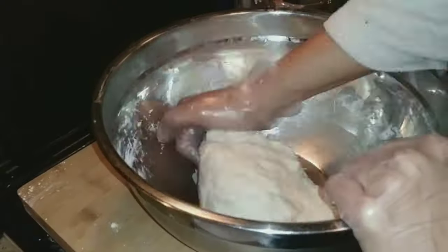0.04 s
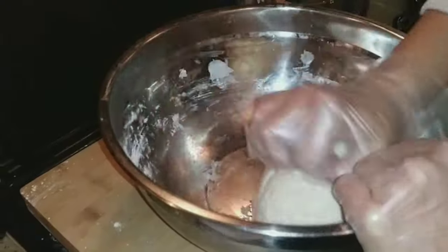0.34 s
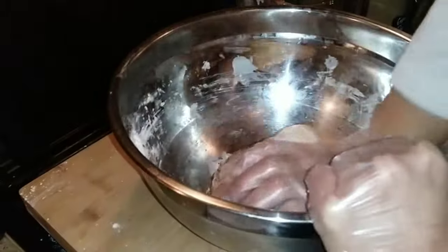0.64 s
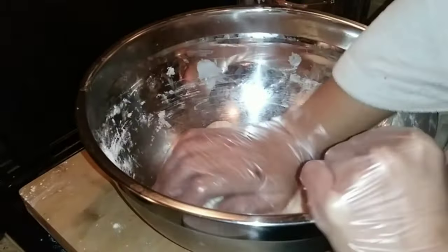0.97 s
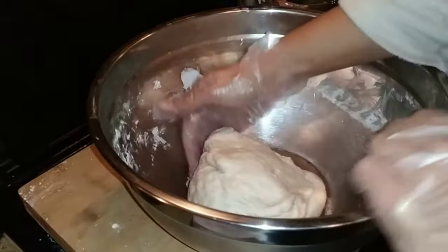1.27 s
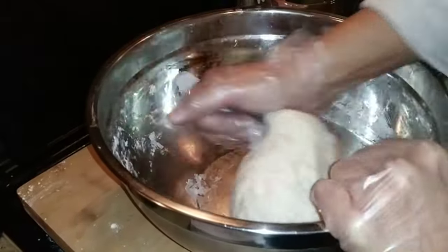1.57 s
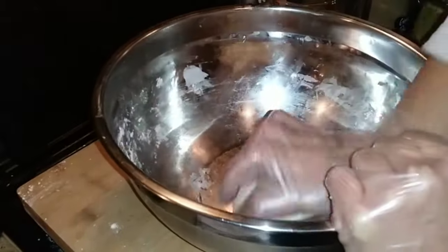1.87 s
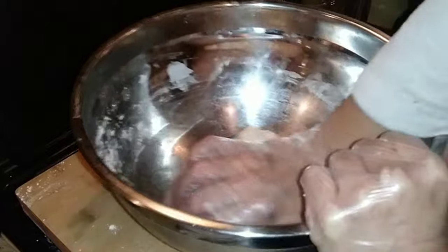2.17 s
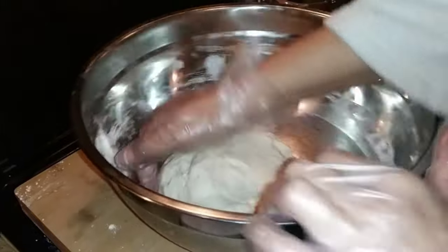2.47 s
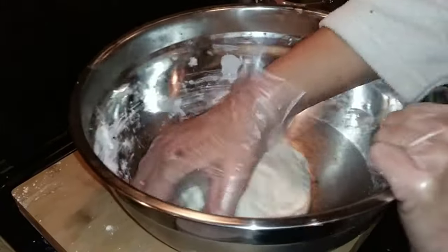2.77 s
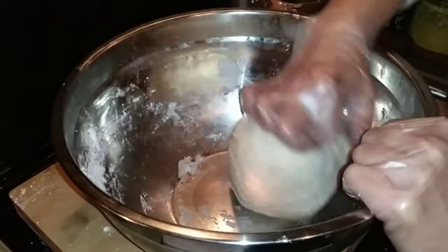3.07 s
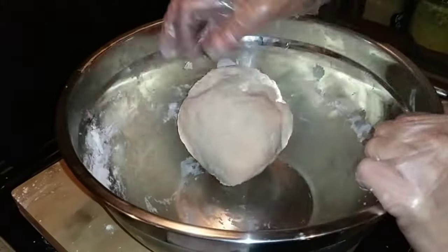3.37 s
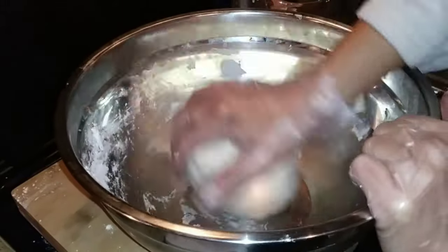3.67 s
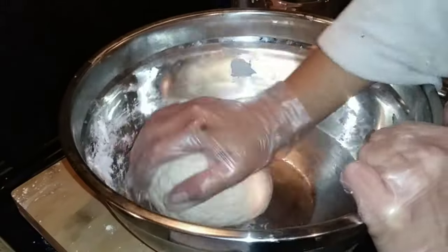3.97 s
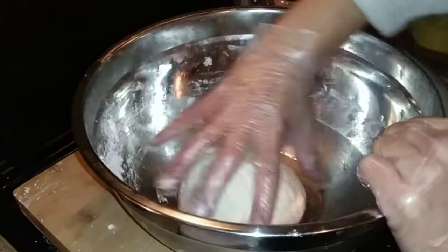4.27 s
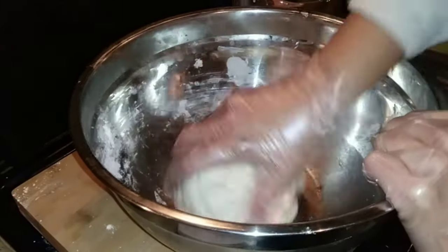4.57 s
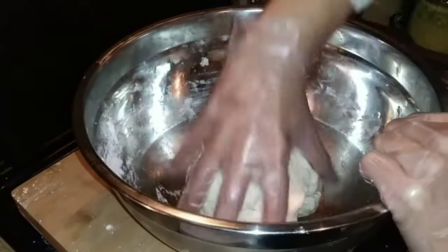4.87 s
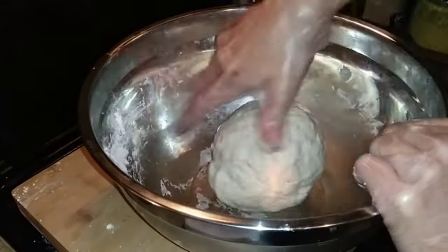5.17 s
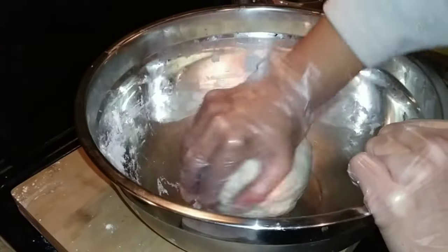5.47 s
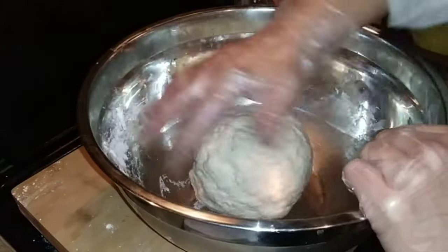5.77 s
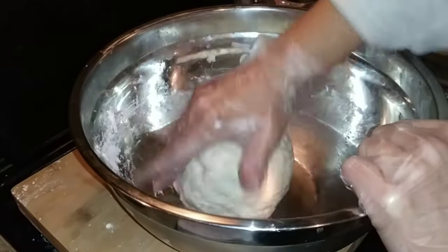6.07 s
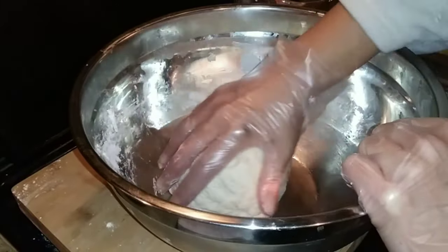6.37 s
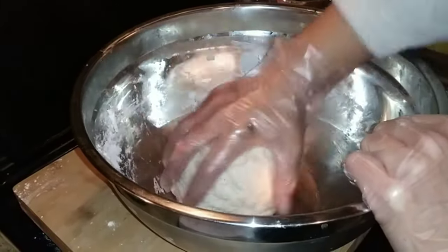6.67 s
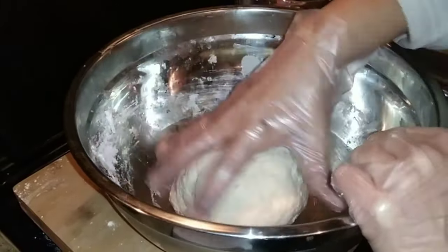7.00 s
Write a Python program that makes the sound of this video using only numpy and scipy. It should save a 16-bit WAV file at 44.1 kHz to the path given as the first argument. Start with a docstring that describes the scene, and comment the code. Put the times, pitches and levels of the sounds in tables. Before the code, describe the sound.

A hand in a thin plastic glove kneads dough in a steel bowl, close to a small microphone in a quiet kitchen. The glove crinkles in bright, uneven strokes with brief rubs, while the dough drags faintly on the steel. The bowl bumps dully on its wooden board, once hard about a third of the way in. Toward the end the strokes become shorter, separate grabs with sharp crackles and snaps.

```python
"""A thin plastic glove kneads dough in a steel bowl, close to a small microphone in a kitchen.
Its film buckles into crinkles with every stroke, rubs as it slides, snaps at single creases
and crackles as it grabs. The dough sticks and slips on the steel. The bowl, damped by the
other hand, knocks on its wooden board, once hard, and thuds under the dough."""
import sys
import numpy as np
from scipy import signal
from scipy.fft import rfft, irfft, next_fast_len
from scipy.io import wavfile
from scipy.ndimage import map_coordinates

SR = 44100
rng = np.random.default_rng(int(sys.argv[2]) if len(sys.argv) > 2 else 0)


def store_wav(level_fs):
    """Save 16-bit WAV to argv[1]."""
    pcm = np.round(np.clip(np.atleast_2d(level_fs), -1, 1) * 32767)
    wavfile.write(sys.argv[1], SR, pcm.T.astype(np.int16))


N = 319284


def amp(db):
    """Decibels to gain."""
    return 10 ** (np.asarray(db) / 20)


def unit_rms(x):
    """Scale to rms 1."""
    return x / np.sqrt(np.mean(x ** 2) + 1e-20)


def at_hz(points, hz):
    """Interpolate (f, value) points on a log frequency axis."""
    knots_hz, values = np.transpose(points)
    return np.interp(np.log(hz + 1), np.log(knots_hz + 1), values)


def per_sample(times_s, values):
    """Interpolate a time curve to N samples."""
    return np.interp(np.arange(N) / SR, times_s, values)


def wobble(rate_hz):
    """Smooth random curve through rate_hz knots a second."""
    knots = rng.standard_normal(int(N * rate_hz / SR) + 4)
    return map_coordinates(knots, [np.arange(N) * rate_hz / SR])


def add(track, start_s, sound):
    """Mix a sound into the track."""
    span = track[round(start_s * SR):][:len(sound)]
    span += sound[:len(span)]


def coloured(x, spectrum, size=4096):
    """Minimum-phase filter of energy 1 with the given spectrum."""
    gain = amp(at_hz(spectrum, np.fft.rfftfreq(size, 1 / SR)))
    cepstrum = irfft(np.log(gain))
    cepstrum[1:size // 2] *= 2
    cepstrum[size // 2 + 1:] = 0
    response = irfft(np.exp(rfft(cepstrum)))
    return signal.fftconvolve(x, response / np.linalg.norm(response))[:len(x)]


def resonate(x, hz, q):
    """Two passes through one resonance; rms 1."""
    resonance = signal.iirpeak(hz, q, fs=SR)
    return unit_rms(signal.lfilter(*resonance, signal.lfilter(*resonance, x)))


def clicks(rate_hz, scatter_db):
    """Random impulses with log-normal sizes; rms 1."""
    chance = np.clip(rate_hz / SR, 1e-4, 1)
    sizes = amp(scatter_db * np.clip(rng.standard_normal(N), -2, 2)) * rng.choice([-1, 1], N)
    return unit_rms((rng.random(N) < chance) * sizes / np.sqrt(chance))


# Rustle between strokes: t/s, drive/dB
REST_DRIVE = [(0, -56), (.85, -60.5), (1, -65), (1.5, -56.5), (3, -52), (3.45, -64.5), (4.5, -59),
              (5.1, -56.5), (5.4, -68), (6.4, -60), (7.24, -56.5)]
# Hand strokes: t/s at full speed, swell/s, hold/s, fade/s, crinkle drive/dB, crumple re crinkle/dB
HAND_STROKES = [(0.0, .05, 0.13, .05, -52.5, 0), (0.323, 0.16, 0.055, 0.26, -39.5, -5),
                (0.641, 0.33, 0.039, 0.062, -44, -2.5), (0.772, 0.22, 0.12, 0.19, -52, -3),
                (1.055, 0.042, 0.02, 0.26, -45.5, -8.5), (1.204, 0.11, 0.042, 0.026, -34, -5.5),
                (1.299, 0.12, 0.018, 0.23, -40.5, -10), (1.435, 0.21, 0.15, .06, -45, -5.5),
                (1.711, 0.1, 0.0066, 0.13, -39, -7.5), (1.914, 0.2, 0.03, 0.11, -35, -9.5),
                (2.079, 0.2, 0.19, 0.24, -51, -2), (2.519, 0.22, 0.034, 0.2, -37, -5.5),
                (2.715, 0.074, 0.047, 0.2, -35.5, -8.5), (2.852, 0.17, 0.094, 0.1, -46, -6),
                (3.053, 0.068, 0.05, 0.027, -31.5, -11), (3.204, 0.19, 0.024, 0.24, -41, -9),
                (3.368, 0.081, 0.04, 0.01, -34, -14), (3.59, 0.15, 0.027, 0.27, -36, -8),
                (3.987, 0.46, 0.037, 0.137, -44, -5), (4.147, 0.07, 0.029, 0.21, -34.5, -6),
                (4.302, 0.3, 0.059, 0.018, -43.5, -8.5), (4.474, 0.22, 0.075, .06, -50.5, -2.5),
                (4.656, 0.066, 0.024, 0.31, -37.5, -6.5), (4.918, 0.018, 0.011, 0.022, -39.5, -20),
                (4.985, 0.014, 0.026, 0.13, -42.5, -6.5), (5.194, 0.12, 0.04, 0.032, -33.5, -14.5),
                (5.286, .04, .01, 0.085, -47.5, -9), (5.722, 0.066, 0.06, 0.039, -30.5, -11.5),
                (6.162, 0.065, 0.046, 0.04, -33, -8.5), (6.553, 0.084, 0.044, 0.037, -33, -10),
                (6.958, 0.17, 0.091, 0.032, -38, -8)]


def kneading(range_db=25.5, rest_crumple_db=-7.5):
    """Hand motion as drive in dB for fine crinkle and deep crumple; a swell or fade spans range_db."""
    t = np.arange(0, N / SR, 0.001)
    moves = [(np.interp(t, *np.transpose(REST_DRIVE)), rest_crumple_db)]
    for full_s, swell_s, hold_s, fade_s, db, offset_db in HAND_STROKES:
        away = np.maximum(full_s - t, 0) / swell_s + np.maximum(t - full_s - hold_s, 0) / fade_s
        moves.append((db - range_db * away, offset_db))
    moves.extend(squeezes(t))
    crinkle_power = sum(amp(db) ** 2 for db, _ in moves)
    crumple_power = sum(amp(db + offset_db) ** 2 for db, offset_db in moves)
    return per_sample(t, 10 * np.log10(crinkle_power)), per_sample(t, 10 * np.log10(crumple_power))


# Fine glove crinkle, with the microphone's bright sheen near 8.5 kHz: f/Hz, level/dB
CRINKLE_SPECTRUM = [(1500, -48.5), (3500, -15), (5000, -13), (6700, -13.5), (7500, -5.5), (8200, 1),
                    (8900, 2.5), (9500, -2.5), (10500, -7), (12500, -14), (15500, -18.5)]
# Deep glove crumple: f/Hz, level/dB
CRUMPLE_SPECTRUM = [(30, -3.5), (100, -16), (300, -4), (500, 0), (630, -12), (850, -2.5), (1400, -1),
                    (2100, 1), (3500, -3.5), (5000, 0.5), (8000, -17), (15000, -43.5)]
# Hollow between hand and bowl: f/Hz, width per pass/Hz, relative level/dB
HOLLOW_MODES = [(844, 200, -10), (2080, 710, -14.5), (2960, 2900, -6)]


def glove_rustle(crinkle_db, crumple_db, hollow_pivot_db=-39.5, hollow_slope=1.67):
    """The film buckles in clumps: faster strokes click more and louder, larger folds sound deeper."""
    rate_hz = 3000 * amp(1.1 * (crinkle_db + 41))
    clumps_db = 1.78 * wobble(30) + 2.4 * wobble(300)
    buckles = clicks(rate_hz, scatter_db=5)
    fine_source = buckles + 1.04 * rng.standard_normal(N)
    deep_source = 0.77 * buckles + clicks(rate_hz, scatter_db=1.5) + 0.38 * rng.standard_normal(N)
    crinkle = amp(crinkle_db - 2) * unit_rms(coloured(fine_source, CRINKLE_SPECTRUM))
    crumple = amp(crumple_db - 5) * unit_rms(coloured(deep_source, CRUMPLE_SPECTRUM))
    hollow = sum(amp(db) * resonate(clicks(rate_hz, scatter_db=2.5), hz, q=hz / width_hz)
                 for hz, width_hz, db in HOLLOW_MODES)
    hollow_db = hollow_pivot_db + hollow_slope * (crumple_db - hollow_pivot_db)
    return amp(clumps_db) * (crinkle + crumple + amp(hollow_db) * hollow)


def glove_ticks(crinkle_db):
    """Taut folds tick throughout and stand out when the rustle is soft."""
    return amp(0.35 * crinkle_db - 48) * coloured(clicks(rate_hz=41, scatter_db=11.5), CRINKLE_SPECTRUM)


# Film slides: centre t/s, length/s, f/Hz, level/dB
SLIDES = [(0.082, 0.13, 680, -54.5), (.06, 0.077, 2900, -58.5), (0.056, .12, 5300, -61.5),
          (0.378, 0.077, 940, -50), (1.322, .08, 5800, -48), (2.131, 0.091, 1990, -57),
          (2.726, 0.12, 6030, -43.5), (2.928, 0.17, 5860, -52), (3.087, 0.06, 4100, -40),
          (3.602, 0.086, 5850, -42.5), (3.948, .12, 6040, -54.5), (4.16, 0.1, 2920, -45.5),
          (4.85, 0.24, 1770, -62), (5.195, .05, 2200, -45), (5.737, 0.032, 2730, -38),
          (5.892, .016, 5750, -48.5), (6.135, .08, 2300, -52), (6.176, 0.067, 860, -46),
          (6.529, .03, 860, -45.5), (6.98, 0.052, 2430, -47)]


def glove_rubs(base_q=1.9, q_per_s=26):
    """Stretched film sticks and slips on dough and steel; a longer slide has a clearer pitch."""
    track = np.zeros(N)
    for centre_s, length_s, hz, db in SLIDES:
        swell = signal.windows.hann(int(length_s * SR))
        friction = resonate(rng.standard_normal(len(swell)), hz, q=base_q + q_per_s * length_s)
        add(track, max(centre_s - length_s / 2, 0), amp(db) * swell * friction)
    return track


# Dough on steel: t/s, level/dB
DRAG_LEVEL = [(0, -57.5), (.25, -60.5), (.55, -49.5), (.9, -61.5), (1.08, -71), (1.37, -57.5),
              (1.93, -70.5), (2.64, -59.5), (3.17, -61.5), (3.45, -66), (4.3, -68.5), (4.8, -63.5),
              (5.6, -72.5), (7.24, -67)]
# Dull body of drags and thuds: f/Hz, level/dB
DOUGH_SPECTRUM = [(30, -9.5), (100, -9.5), (200, -7), (330, -3), (520, -4), (700, -15), (1500, -28)]


def dough_drag():
    """Dough sticks and slips on the steel with a dull, uneven murmur."""
    level_db = per_sample(*np.transpose(DRAG_LEVEL)) + 4.2 * wobble(22)
    slips = clicks(rate_hz=1500, scatter_db=7)
    return amp(level_db) * unit_rms(coloured(slips, DOUGH_SPECTRUM))


# Background noise: f/Hz, level/dB
HUSH_SPECTRUM = [(15, -72), (25, -24), (148, -30.5), (509, -12.5), (631, -11), (1380, -7), (1570, -29),
                 (1800, -15.5), (6380, -20.5), (8580, -12), (15500, -26.5)]


def room_hush(level_db=-67.5):
    """Faint steady noise."""
    return amp(level_db) * coloured(rng.standard_normal(N), HUSH_SPECTRUM)


# Loudest creases: t/s, relative level/dB
CREASE_SNAPS = [(0.3195, -24), (0.423, -25), (0.627, -24.5), (0.669, -24.5), (1.2379, -20), (1.486, -28),
                (1.57, -30.5), (1.9897, -28), (3.145, -32), (3.1919, -25), (3.3278, -34.5), (3.706, -30),
                (4.102, -30.5), (4.478, -29.5), (4.715, -18), (4.8331, -30.5), (4.923, -29), (5.183, -21),
                (5.4862, -30.5), (6.1436, -27.5), (6.1668, -9.5), (6.1692, -10), (6.317, -35),
                (6.4481, -31.5), (6.5806, -15.5), (6.693, -35.5), (6.782, -26.5), (6.967, -14),
                (6.9712, -19)]
# Crease snap, with the microphone's bright sheen near 8.5 kHz: f/Hz, level/dB
SNAP_SPECTRUM = [(30, -65), (150, -10.5), (450, -12.5), (850, -6), (1400, -10), (2300, -10.5), (4500, -6.5),
                 (6700, -11.5), (8500, 6.5), (10500, -4), (15500, -19.5)]


def crease_snaps(flutter_gain=0.24, flutter_t60_s=0.018, low_cut_hz=536):
    """A taut crease, too small to radiate bass, flips with one click and a brief flutter."""
    track, t = np.zeros(N), np.arange(SR // 50) / SR
    for start_s, db in CREASE_SNAPS:
        flip = flutter_gain * rng.standard_normal(len(t)) * amp(-60 * t / flutter_t60_s)
        flip[0] = 1  # the click
        add(track, start_s + 0.00082, amp(db + 5.5) * flip)
    return signal.lfilter(*signal.butter(1, low_cut_hz, "high", fs=SR), coloured(track, SNAP_SPECTRUM))


# Hand-held bowl on its board: f/Hz, level/dB, t60/s
BOWL_MODES = [(99.5, -28, 0.26), (182.6, -22.5, 0.33), (216.3, -20.5, 0.5), (295, -1, 0.18),
              (324.7, 4, 0.1), (392, -15, 0.26), (473, -3.5, 0.16), (524.3, -1.5, 0.12), (609, -54, 0.037),
              (703, -10.5, 0.14), (792, -5, 0.068), (916, -8.5, 0.078), (1038, -3, 0.053),
              (1250, -5, 0.081), (1392, -11.5, 0.1), (1538, -4, 0.039), (1870, -13, 0.2), (2195, -13, 0.11)]
# Blows: t/s, relative level/dB, contact cutoff/Hz, t60 factor, base boom/dB
BOWL_BLOWS = [(0.325, -22.5, 463, 0.87, 4), (0.489, -26.5, 910, 0.71, 11.5), (1.453, -34.5, 395, 0.45, 9.5),
              (2.436, -14, 1097, 0.8, 3.5), (2.872, -49, 500, 2.4, 2), (3.180, -31.5, 550, 0.35, 10.5),
              (3.593, -42.5, 477, 1.45, -2), (3.769, -23.5, 480, 0.4, -4), (3.88, -44.5, 604, 0.63, 6),
              (5.43, -35, 744, 0.45, -13.5), (6.736, -38, 734, 0.47, 1)]


def bowl_knocks(thump_gain=0.46, thump_t60_s=0.14, attack_s=0.0024):
    """Each blow rings the bowl and thumps the board; soft contact leaves out the high modes."""
    track, t = np.zeros(N), np.arange(SR // 2) / SR
    hz, mode_db, t60_s = np.transpose(BOWL_MODES)[:, :, None]
    is_base = hz < 250  # these modes boom unless dough presses the base down
    attack = 1 - np.exp(-t / attack_s)
    for start_s, db, cutoff_hz, t60_factor, boom_db in BOWL_BLOWS:
        strength = amp(mode_db + is_base * boom_db + 0.8 * rng.standard_normal(hz.shape))
        strength /= np.sqrt(1 + (hz / cutoff_hz) ** 5)
        detune = 1 + 0.015 * rng.standard_normal(hz.shape)  # load of hand and dough varies
        phase = 2 * np.pi * hz * detune * t + 1.4 * rng.standard_normal(hz.shape)
        ring = np.sum(strength * amp(-60 * t / (t60_s * t60_factor)) * np.sin(phase), axis=0)
        thump_decay = amp(-60 * t / (thump_t60_s * t60_factor))
        thump = coloured(rng.standard_normal(len(t)) * thump_decay, DOUGH_SPECTRUM)
        add(track, start_s, amp(db + 1.5) * (ring + thump_gain * thump) * attack)
    return track


# Glove landing on dough: t/s, relative level/dB, t60/s
FINGER_GRABS = [(1.296, -25, 0.1), (3.0178, -26.5, 0.084), (4.1265, -27, 0.26), (4.479, -28, 0.042),
                (5.4314, -16.5, 0.074), (5.6752, -32.5, 0.09), (5.8904, -38, 0.15), (5.9493, -16.5, 0.038),
                (6.167, -17.5, 0.12), (6.3466, -22.5, 0.082), (6.52, -21, 0.073), (6.7345, -21.5, 0.091),
                (7.149, -30, 0.13)]


def grabs(attack_s=0.0026, thud_db=-16):
    """Landing fingers crush many creases at once and thud on the dough."""
    force, t = np.zeros(N), np.arange(SR // 4) / SR
    attack = (1 - np.exp(-t / attack_s)) ** 2
    for land_s, db, t60_s in FINGER_GRABS:
        add(force, land_s - 0.002, amp(db - 6 - 60 * t / t60_s) * attack)
    thud = amp(thud_db) * soften_thuds(coloured(rng.standard_normal(N), DOUGH_SPECTRUM))
    crackle = coloured(clicks(rate_hz=9000, scatter_db=1.5), SNAP_SPECTRUM)
    return force * (crackle + thud)


def squeezes(t, gain_db=-23, brush_db=25.5, brush_s=0.004, fade_db_per_s=117, crumple_offset_db=-10.5):
    """Fingers brush the dough, land and close: yields crinkle drive and crumple offset per grab."""
    for land_s, db, _ in FINGER_GRABS:
        before_db = brush_db * np.maximum(land_s - t, 0) / brush_s
        after_db = fade_db_per_s * np.maximum(t - land_s, 0)
        yield db + gain_db - before_db - after_db, crumple_offset_db


def soften_thuds(x, band_hz=(96, 5100)):
    """Trim deep bass and high hiss so knocks and thuds sound dull."""
    return signal.sosfilt(signal.butter(1, band_hz, "band", fs=SR, output="sos"), x)


def bowl_walls(x, echo_db=-3, t60_s=0.058, cutoff_hz=5000, size=4096):
    """Curved steel adds short echoes, redrawn block by block for the moving hand."""
    track, t = np.zeros(N), np.arange(SR // 25) / SR
    window, padded = signal.windows.hann(size, sym=False), np.pad(x, (0, size))
    for start in range(0, N, size // 2):
        echoes = rng.standard_normal(len(t)) * amp(-60 * t / t60_s) * (t > 0.0004)
        response = amp(echo_db) * echoes / np.linalg.norm(echoes)
        add(track, start / SR, signal.fftconvolve(window * padded[start:start + size], response))
    return x + signal.lfilter(*signal.butter(1, cutoff_hz, fs=SR), track)


# Room decay: f/Hz, t60/s
KITCHEN_DECAY = [(150, 0.45), (1000, 0.11), (5000, 0.06), (14000, 0.087)]


def kitchen(x):
    """Short room tail; the bass outlasts the treble."""
    hz, t, noise = signal.stft(rng.standard_normal(SR // 2), SR, nperseg=256)
    decay = amp(-60 * t / at_hz(KITCHEN_DECAY, hz)[:, None])
    _, tail = signal.istft(noise * decay, SR, nperseg=256)
    delayed = np.pad(x, (SR // 200, 0))
    return signal.fftconvolve(delayed, tail / np.linalg.norm(tail))[:N]


def scene():
    """Glove, dough and bowl in a quiet kitchen; mono."""
    crinkle_db, crumple_db = kneading()
    glove = glove_rustle(crinkle_db, crumple_db) + glove_ticks(crinkle_db) + grabs() + crease_snaps()
    near = bowl_walls(glove) + glove_rubs() + soften_thuds(bowl_knocks() + dough_drag())
    return (near + room_hush() + amp(-22) * kitchen(near))[None]


def record(dry):
    """The small microphone thins the deep bass; a hard band limit cuts the top."""
    low_cut_hz, top_hz = 55, 15800
    thinned = signal.sosfilt(signal.butter(1, low_cut_hz, "high", fs=SR, output="sos"), dry)
    size = next_fast_len(N + SR // 2)
    passband = np.fft.rfftfreq(size, 1 / SR) < top_hz
    return irfft(rfft(thinned, size) * passband, size)[..., :N]


dry = scene()
out = record(dry)
store_wav(out)
```